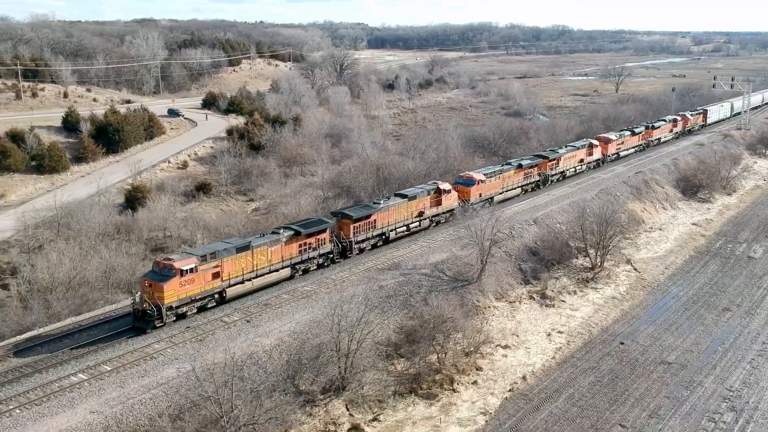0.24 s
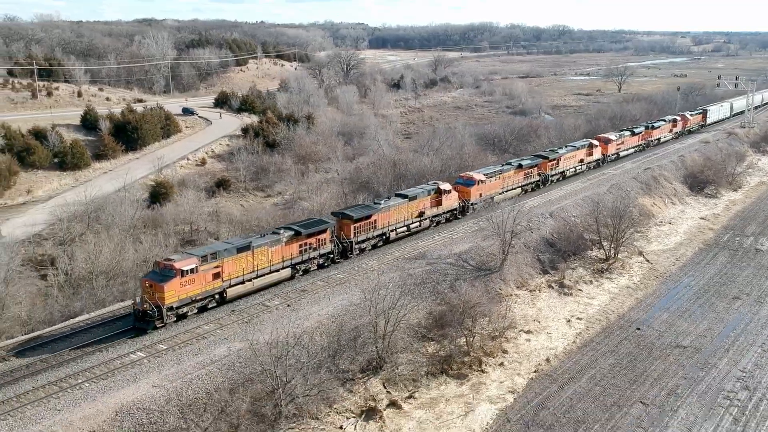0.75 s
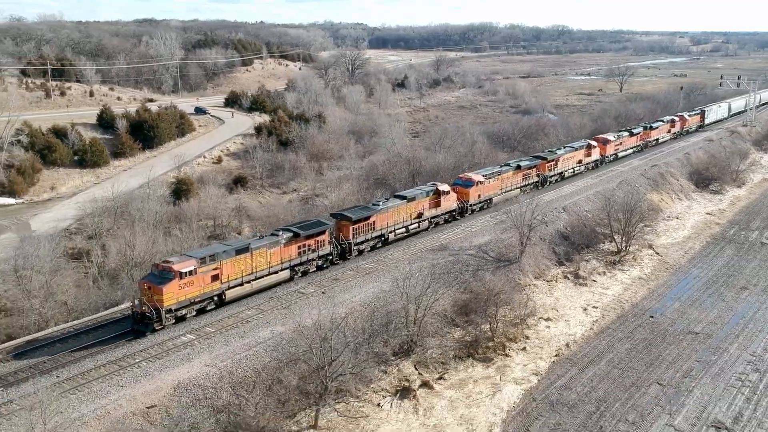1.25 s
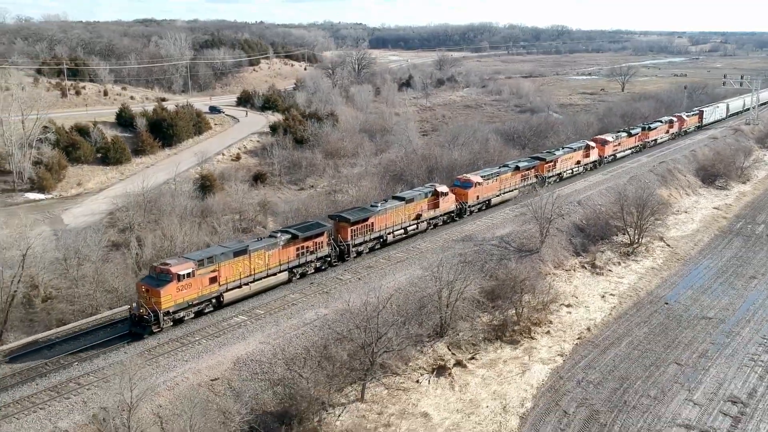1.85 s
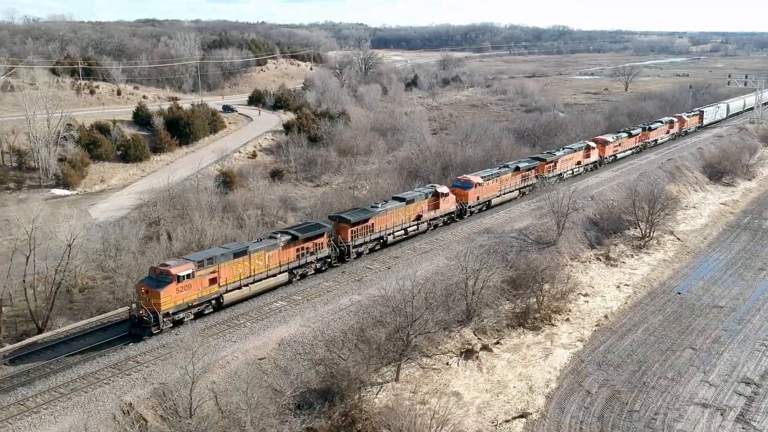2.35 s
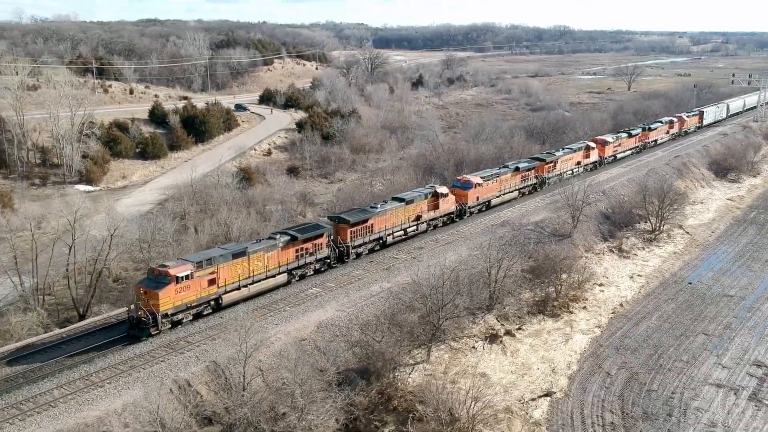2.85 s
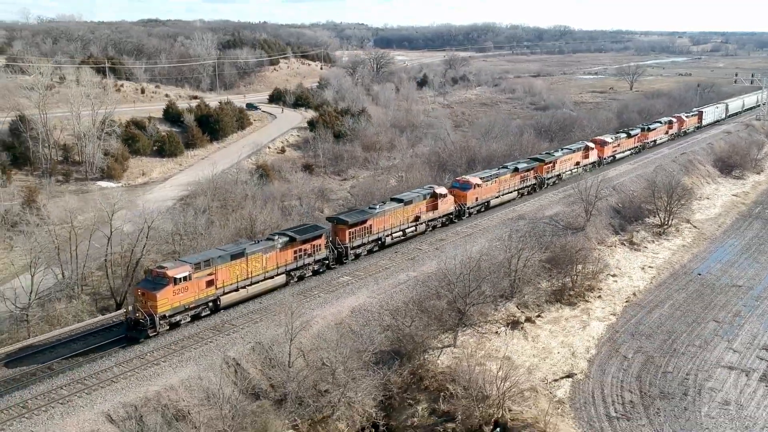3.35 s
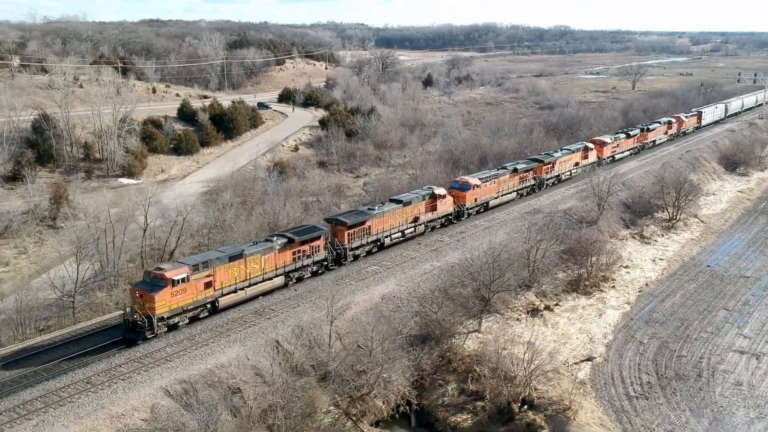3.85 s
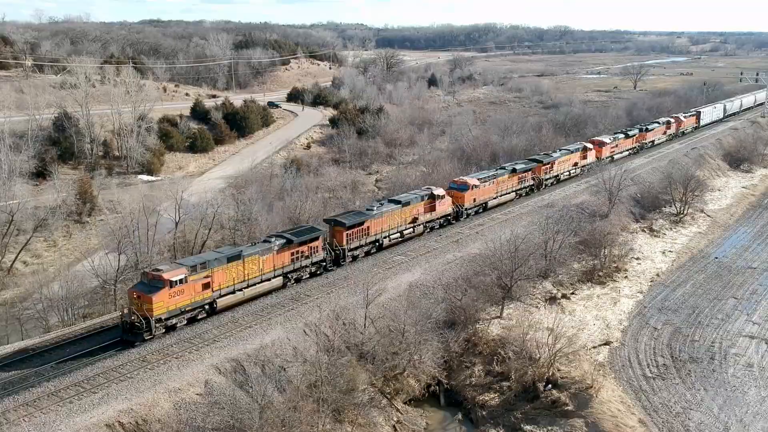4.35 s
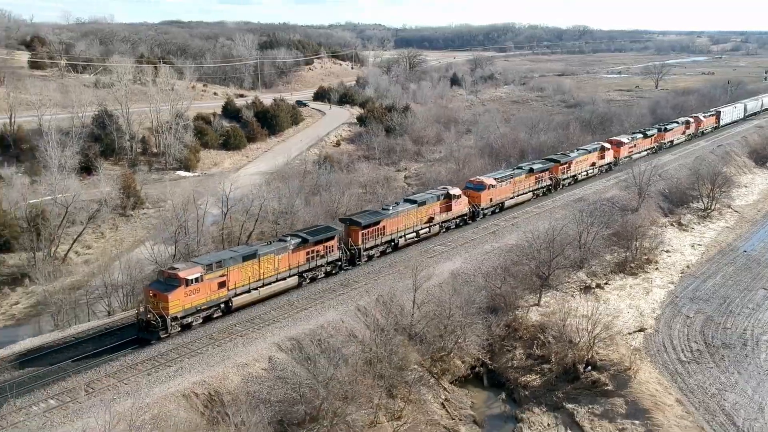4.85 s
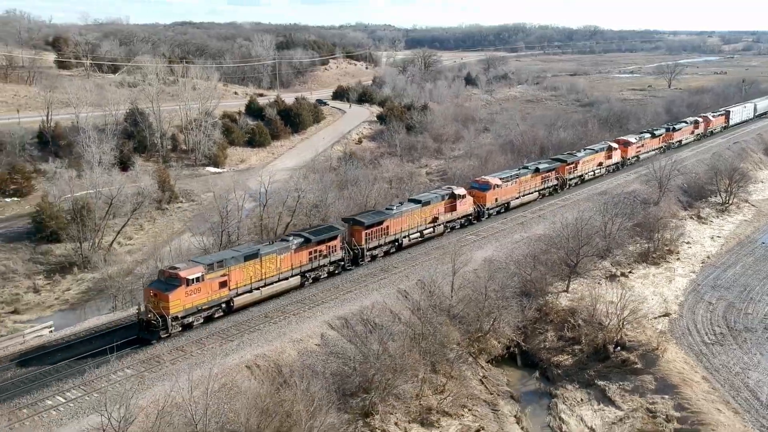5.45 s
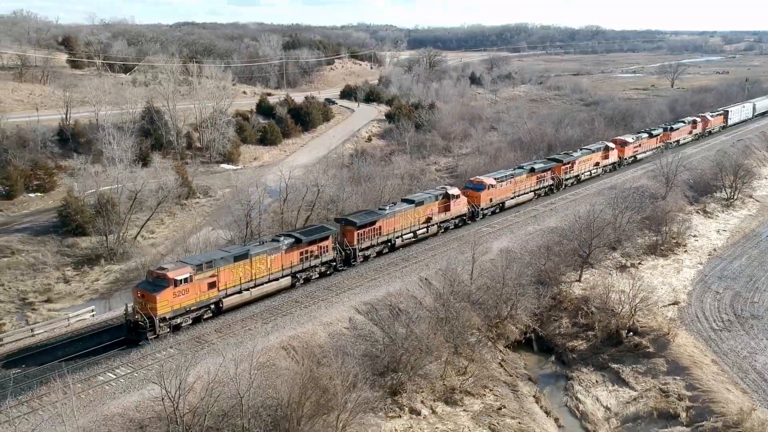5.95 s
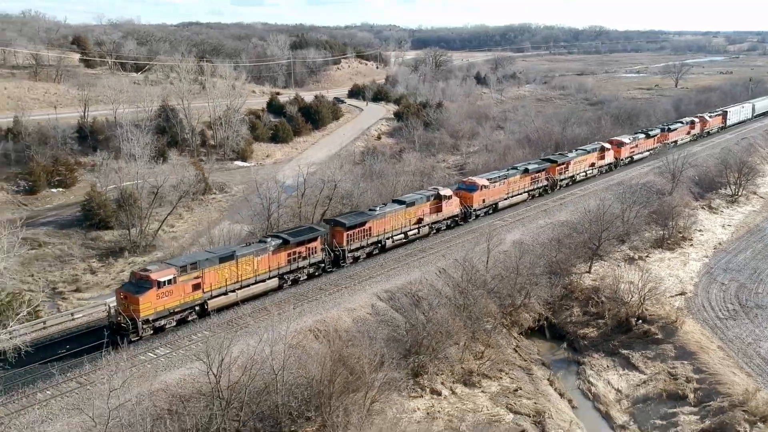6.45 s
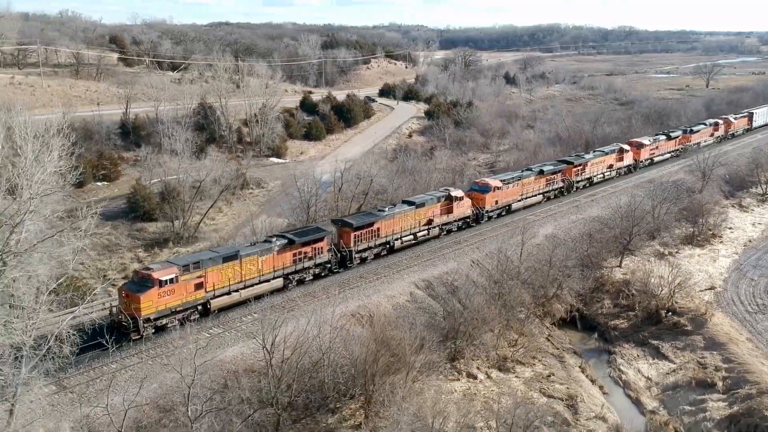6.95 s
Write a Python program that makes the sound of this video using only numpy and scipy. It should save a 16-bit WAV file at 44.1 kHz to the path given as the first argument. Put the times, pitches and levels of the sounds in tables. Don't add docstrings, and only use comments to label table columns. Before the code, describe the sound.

Outdoors, a small four-rotor drone hovers some way off, a steady airy rush of blades with thin whining tones that sag slightly in pitch and a very high faint hiss. A dull roll lies far below. Wind thumps a thin, bright microphone; near the middle a hard blast buffets and clicks it. The rush dims, then returns stronger with breathy whistles.

```python
import sys
import numpy as np
from scipy import signal
from scipy.fft import rfft, irfft, next_fast_len
from scipy.io import wavfile
from scipy.ndimage import uniform_filter1d

SR = 44100
rng = np.random.default_rng(int(sys.argv[2]) if len(sys.argv) > 2 else 0)


def voltage_ratio(decibels):
    exponent = np.asarray(decibels, float) / 20
    return 10 ** exponent


def transcribe(signal):
    frames = np.atleast_2d(signal).T
    limited = np.clip(frames, -1, 1)
    pcm = np.round(limited * 32767).astype(np.int16)
    wavfile.write(sys.argv[1], SR, pcm)


N = 317079
TIME_S = np.arange(N) / SR
SIZE = next_fast_len(N)
FREQ_HZ = np.maximum(np.arange(SIZE // 2 + 1) * SR / SIZE, 1)


def in_time(rows):
    time_s, *columns = np.transpose(rows)
    return [np.interp(TIME_S, time_s, c) for c in columns]


def swells(rows, blunt=1):
    centre_s, length_s, *columns = np.transpose(rows)
    coarse_s = np.arange(0, N + 64, 64) / SR
    phase = np.clip((coarse_s[:, None] - centre_s) / length_s, -.5, .5)
    arch = abs(np.cos(np.pi * phase)) ** blunt
    return [np.interp(TIME_S, coarse_s, arch @ c) for c in columns]


def rms_one(x):
    return x / np.sqrt(np.mean(x ** 2) + 1e-20)


def drift(rate_hz):
    r = np.exp(-80 * np.pi * rate_hz / SR)
    slow = signal.lfilter([1], [1, -2 * r, r * r], rng.standard_normal(N // 40 + 2002))[2000:]
    return np.interp(np.arange(N) / 40, np.arange(len(slow)), rms_one(slow))


def quick(rate_hz):
    slow = drift(rate_hz)
    return rms_one(slow - uniform_filter1d(slow, SR // 6))


def coloured(points):
    hz, db = np.transpose(points)
    tilt_db = np.interp(np.log(FREQ_HZ), np.log(hz), db, left=-120, right=-120)
    return rfft(rng.standard_normal(SIZE)) * voltage_ratio(tilt_db)


def steady(colour):
    return rms_one(irfft(coloured(colour), SIZE)[:N])


def smeared(width_hz, size):
    low = signal.butter(3, width_hz, fs=SR, output="sos")
    real, imaginary = signal.sosfilt(low, rng.standard_normal((2, size)))
    return rms_one(real) + 1j * rms_one(imaginary)


# time_s, loudness_db, clarity_db (top against the whole)
AIR_PATH = [(0.0, -28, -19.5), (0.32, -27.5, -23.5), (0.72, -26, -17.5), (0.84, -28.5, -22.5),
            (1.88, -29.5, -24.5), (3.6, -24, -18), (3.76, -31.5, -18.5), (4.14, -34, -22),
            (4.35, -31.5, -21), (4.58, -34, -19.5), (5.21, -31, -20.5), (5.31, -29.5, -19),
            (5.47, -25, -17.5), (5.67, -26.5, -21), (5.99, -23, -14), (6.59, -27.5, -19),
            (6.89, -25.5, -18), (7.19, -27.5, -16.5)]
# centre_s, length_s, gain_db, clarity_gain_db
EDDIES = [(.29, 0.18, 3, 4.5), (.7, 0.66, 2.5, 4.5), (.2, 0.14, 1, 3), (.1, .1, 0, 1.5), (2.8, 0.24, 1, 2),
          (3.68, 0.24, 0, -5), (5.1, 0.24, -2, -1), (5.75, 0.086, -1.5, 2.5), (1.3, 0.26, 1.5, 1),
          (1.56, 0.21, 1.5, -0.5), (2.35, 0.12, 1.5, 1), (3.0, 0.13, 2.5, 3), (3.2, .14, 0, 0.5),
          (3.52, 0.6, 0, 0), (4.36, 0.14, 2, 1.5), (4.88, 0.16, -1.5, 2), (5.3, 0.16, 3, -2),
          (5.47, 0.22, 1, -0.5), (5.92, 0.15, 0.5, 1), (6.1, 0.099, -1, -1), (6.27, 0.057, -0.5, -5.5),
          (6.4, 0.26, 0.5, -1), (6.86, 0.14, 0.5, 1)]


def path():
    loud_db, clear_db = np.add(in_time(AIR_PATH), swells(EDDIES))
    return loud_db, clear_db - clear_db.mean()


ZONE_CLARITY = [-0.55, -0.00046, 0.17, 0.55, 0.59]


def body():
    loud_db, clear_db = path()
    return loud_db - 6 + ZONE_CLARITY[0] * clear_db


# freq_hz, density_db_per_hz
SELF_NOISE_COLOUR = [(8000, -15), (10500, 0), (12500, -6), (13700, -6), (13950, -8)]


def self_noise():
    return voltage_ratio(-77) * steady(SELF_NOISE_COLOUR)


# time_s, level_db
FAR_LEVEL = [(0, -44.5), (.8, -43.5), (1.6, -52.5), (2.6, -47.5), (3.6, -49), (4, -58), (5.2, -59),
             (5.6, -55), (6.4, -47.5), (7.19, -52.5)]
# freq_hz, density_db_per_hz
FAR_COLOUR = [(520, -19), (600, -2.5), (720, -0.5), (950, -3.5), (1150, 0)]


def far_roll():
    return voltage_ratio(in_time(FAR_LEVEL)[0]) * steady(FAR_COLOUR)


# freq_hz, density_db_per_hz
WIND_COLOUR = [(35, -91), (60, -61), (170, -13), (285, -5), (839, 3), (1020, -1), (1200, 3.5), (1300, -19),
               (1690, -31), (2860, -120)]
# centre_s, length_s, gain_db (over the breeze), brightness_gain_db
GUSTS = [(.06, 0.38, 3, 12), (.31, .14, -2, -2), (.95, .1, 5, 3), (1.08, .18, 8, 0), (1.33, .4, -10, 2),
         (2.1, 0.89, 0.5, 22), (2.45, 0.42, 3.5, 7), (2.6, 0.11, 10.5, -26), (2.72, 0.18, 10, -9),
         (3.0, .5, 2, 6), (3.47, 0.19, 9, -10), (3.95, 0.12, 12, 1), (4.04, .06, 12, -8),
         (4.165, 0.095, 10.5, -2), (4.0, 0.026, 6, 17), (4.27, 0.17, 6, -26), (4.54, 0.073, 8, -2),
         (4.75, 0.54, -6, -1), (5.19, 0.17, 4.5, -12), (5.41, .07, 1, -1), (5.48, .08, -2, 11),
         (5.9, .8, 2, 0), (6.84, .08, 1.5, 4), (6.94, 0.089, 3, 0)]
# centre_s, length_s, gain_db, brightness_gain_db
BLAST = [
    (3.57, .08, 13, -6),
    (3.725, .23, 16.5, -1),
    (3.66, .09, .5, 6),
    (3.85, .04, 9, -6),
]


def wind(lumpy_db, split_hz):
    breeze_db, breeze_bright_db = -57, -2
    gust_db, bright_db = np.add(swells(GUSTS), swells(BLAST, blunt=.3))
    gust_db = gust_db + breeze_db
    bright_db = bright_db + breeze_bright_db
    gust_db = gust_db + 1.04 * (gust_db - gust_db.max())
    noise = coloured(WIND_COLOUR)
    upper = 1 / (1 + (split_hz / FREQ_HZ) ** 4)
    thump = rms_one(irfft(noise * (1 - upper), SIZE)[:N] * voltage_ratio(lumpy_db * drift(23)))
    rasp = rms_one(irfft(noise * upper, SIZE)[:N] * voltage_ratio(lumpy_db * drift(40)))
    return voltage_ratio(gust_db + 4.5) * (thump + voltage_ratio(bright_db) * rasp)


# time_s, peak_db
SNAPS = [(3.625, -15), (3.644, -15), (3.689, -20), (3.718, -21), (3.744, -15), (3.786, -21)]


def snaps():
    ring_hz, t60_s = 1000, .006
    clicks = np.zeros(N)
    for time_s, peak_db in SNAPS:
        clicks[round(time_s * SR)] = voltage_ratio(peak_db - 2)
    r, w = voltage_ratio(-60 / (t60_s * SR)), 2 * np.pi * ring_hz / SR
    return signal.lfilter([0, np.sin(w)], [1, -2 * r * np.cos(w), r * r], clicks + 1e-18)


def port():
    gusts = wind(lumpy_db=4.0, split_hz=520) + snaps()
    return signal.sosfilt(signal.butter(4, 178, "high", fs=SR, output="sos"), gusts)


# pitch_hz, level_db
SHAFT_HUM = [(102.4, -83)]


def shaft():
    hum = 0
    for pitch_hz, level_db in SHAFT_HUM:
        hum = hum + np.sqrt(2) * voltage_ratio(level_db + 1.9 * drift(2.1)) * np.sin(2 * np.pi * pitch_hz * TIME_S)
    return hum * voltage_ratio(0.46 * (body() + 24.5))


# centre_s, length_s, gain_db
DRIVE_TURNS = [
    (.7, 0.17, 0.5),
    (1.5, 0.67, 10),
    (2.0, .4, -1),
    (2.6, 0.47, -4),
    (3.35, 0.12, 0.5),
    (3.8, 0.95, -7),
    (4.6, .3, -3),
    (5.7, 0.99, 4.5),
    (6.6, 0.35, -1.5),
]
# freq_hz, density_db_per_hz
DRIVE_FLOOR = [(7000, -4.5), (8000, 6.5), (8300, 4), (10000, 0), (10700, -2.5), (11900, -1), (12400, -1),
               (13300, -14)]


def drive(floor_db):
    start_hz, sag_hz_per_s, width_hz = 11470, 17, 280
    loud_db, clear_db = path()
    level_db = -76 + 0.29 * (loud_db - loud_db.mean()) + 0.96 * clear_db
    level_db = level_db + 1.06 * TIME_S + swells(DRIVE_TURNS)[0]
    turn = 2 * np.pi * np.cumsum(start_hz - sag_hz_per_s * TIME_S) / SR
    narrow = np.real(smeared(width_hz, size=N) * np.exp(1j * turn))
    wide = voltage_ratio(floor_db - 0.15 * (level_db - level_db.mean())) * steady(DRIVE_FLOOR)
    return voltage_ratio(level_db + 1.3 * drift(6.7)) * (narrow + wide)


# start_s, length_s, pitch_hz, width_hz, level_db
WHISTLES = [(0.145, 0.69, 2300, 151, -32), (0.202, 0.15, 3700, 250, -38), (4.2, 0.33, 2150, 180, -37),
            (5.249, 0.47, 2380, 260, -31), (5.87, .1, 2250, 400, -27.5), (6.0, 0.2, 2300, 280, -29),
            (5.5, .12, 2900, 250, -34), (6.26, .2, 3050, 220, -34.5), (4.15, .99, 1400, 90, -46),
            (.22, 0.11, 3200, 700, -34), (.22, .1, 2280, 300, -31), (5.27, .1, 2080, 200, -34),
            (6.55, .42, 2060, 130, -35), (1.2, .5, 1750, 90, -39), (6.2, 0.2, 1740, 98, -36),
            (6.31, 0.25, 2300, 300, -30), (6.301, 0.81, 2160, 180, -33.5), (6.3, 0.59, 2950, 200, -37),
            (6.7, .3, 2830, 150, -32), (6.701, 0.43, 3640, 200, -36.5), (7.0, 0.1, 2280, 270, -29.5),
            (5.27, 0.24, 3700, 300, -35.5), (5.8, 0.4, 4040, 350, -35.5)]


def whistles():
    gain_db, wander, patchy_db = .3, .018, 1.5
    out, bend, patch = np.zeros(N), quick(10.0), quick(14.0)
    for k, (start_s, length_s, pitch_hz, width_hz, level_db) in enumerate(WHISTLES):
        n = np.arange(int(start_s * SR), min(int((start_s + length_s) * SR), N))
        own = (n + k * SR // 3) % N
        arch = np.sin(np.pi * (n / SR - start_s) / length_s)
        swell = arch * voltage_ratio(level_db + gain_db + patchy_db * patch[own])
        turn = 2 * np.pi * pitch_hz * np.cumsum(1 + wander * bend[own]) / SR
        band = smeared(.65 * width_hz, size=SR)[:len(n)]
        out[n] += swell * np.real(band * np.exp(1j * turn))
    return out


# start_hz, sag_hz_per_s, rest_db (against the rush body)
ROTOR_A = (1415, 3.9, -14)
ROTOR_B = (1478, 2.9, -22.5)
ROTOR_C = (1728, .9, -27)
ROTOR_D = (1703, .7, -27)
ROTOR_LATE = (1434, 1.2, -22)
# centre_s, length_s, gain_db
FORWARD_A = [(.3, 1.2, 3), (1.4, .6, 4), (2.32, .5, 8), (2.6, .5, 3), (3.2, 1.2, 4), (3.6, .5, 5),
             (4.4, .7, 3), (4.79, .24, 11), (5.09, .34, 13), (6.23, .2, -4), (7, .9, 6)]
FORWARD_B = [(.3, 1.5, 11), (1.8, .7, 10), (2.8, 1.4, 12), (6.75, 1.4, 9)]
FORWARD_C = [(1.7, 5.8, 14), (1.4, .7, 5), (2.45, .7, 4), (3.8, 1, 4)]
FORWARD_D = [(1.7, 4, 8), (1.45, .6, 6), (2.4, 1, 9), (3.2, .5, 9)]
FORWARD_LATE = [(4, .8, 11), (5.1, .9, 9), (5.95, 1.1, 12), (6.85, 1.4, 10)]
# ratio (to the loudest overtone), level_db (relative)
ORDERS_A = [(.5, -22), (1.245, -7), (1.48, -7)]
ORDERS_C = [(.2, -24)]
ORDERS_D = [(.201, -16)]


def rotor(tone, forward, orders, wobble, fade_db):
    start_hz, sag_hz_per_s, rest_db = tone
    pitch_hz = (start_hz - sag_hz_per_s * TIME_S) * (1 + wobble * drift(8.17))
    turn = 2 * np.pi * np.cumsum(pitch_hz) / SR
    tones = 0
    for ratio, level_db in [(1, 0.013)] + list(orders):
        level = voltage_ratio(level_db + fade_db * drift(8.9))
        tones = tones + level * np.sin(ratio * turn + 6 * rng.random())
    return np.sqrt(2) * voltage_ratio(rest_db + swells(forward)[0] + body()) * tones


def rotors():
    front = rotor(ROTOR_A, FORWARD_A, ORDERS_A, wobble=0.00162, fade_db=2.5)
    front = front + rotor(ROTOR_B, FORWARD_B, [], wobble=0.00124, fade_db=2.5)
    rear = rotor(ROTOR_C, FORWARD_C, ORDERS_C, wobble=0.00092, fade_db=1.0)
    rear = rear + rotor(ROTOR_D, FORWARD_D, ORDERS_D, wobble=0.0007, fade_db=2.5)
    late = rotor(ROTOR_LATE, FORWARD_LATE, [], wobble=0.00168, fade_db=2.5)
    return front + voltage_ratio(1.5) * rear + late


RUSH_ZONES_HZ = [1500, 2300, 3700, 5500, 7500]
# freq_hz, density_db_per_hz
RUSH_COLOUR = [(60, -70), (100, -40), (290, -16), (530, -27), (700, -15.5), (1200, -6.5), (1400, -2.5),
               (2300, 0.5), (3300, -4.5), (3900, -4), (4400, -9.5), (4800, -14), (7800, -31.5), (8200, -45)]


def rush(flutter_db, patchy_db):
    loud_db, clear_db = path()
    zones_db = loud_db + np.outer(ZONE_CLARITY, clear_db)
    zones_db[-1] += 0.81 * swells(DRIVE_TURNS)[0]
    zones_db = zones_db - zones_db.mean(axis=1, keepdims=True)
    noise, flutter, out = coloured(RUSH_COLOUR), quick(21), 0
    third = 3 * np.log2(FREQ_HZ / 55)
    for k in range(25):
        band = irfft(noise * np.clip(1 - abs(third - k), 0, 1), SIZE)[:N]
        place = np.interp(np.log(55 * 2 ** (k / 3)), np.log(RUSH_ZONES_HZ), range(5))
        share = np.clip(1 - abs(place - np.arange(5)), 0, 1)
        short_wave = min(k / 21, 1) ** 2
        level_db = share @ zones_db + short_wave * flutter_db * flutter + patchy_db * drift(5.7)
        out = out + band * voltage_ratio(level_db)
    return voltage_ratio(-28) * rms_one(out)


def scene():
    drone = drive(floor_db=3.5) + shaft() + whistles() + rotors() + rush(flutter_db=1.3, patchy_db=.7)
    return (far_roll() + port() + drone)[None]


# freq_hz, step_db
TOP_STEP = [(5500, -85), (6900, -62), (7700, -56), (8150, -51), (8500, -56), (8800, -53), (9500, -56),
            (10700, -54), (11400, -55), (12200, -53), (12600, -59), (13600, -58), (13950, -53)]


def coarse_top(x, uneven_db, follow, hop=1024, start=420):
    bins, n = np.arange(256, 656), np.arange(2 * hop)
    window = signal.windows.kaiser_bessel_derived(2 * hop, 4 * np.pi)
    cosines = np.cos(np.pi / hop * np.outer(n + .5 + hop / 2, bins + .5))
    basis = window[:, None] * cosines * np.sqrt(2 / hop)
    padded = np.pad(x, (2 * hop - start, 3 * hop))
    frames = np.lib.stride_tricks.sliding_window_view(padded, 2 * hop)[::hop].copy()
    fine = frames @ basis
    loud_db = 10 * np.log10(np.mean(fine[:, 130:] ** 2, axis=1, keepdims=True) + 1e-9)
    hz, db = np.transpose(TOP_STEP)
    uneven = np.repeat(rng.standard_normal((len(fine), 25)), 16, axis=1)
    step_db = np.interp(bins * SR / 2 / hop, hz, db) + uneven_db * uneven
    step = voltage_ratio(step_db + follow * (loud_db - loud_db.mean()))
    rounded = np.sign(fine) * np.floor(abs(fine) / step + .4) * step
    error = (rounded - fine) @ basis.T
    overlap = error[1:, :hop] + error[:-1, hop:]
    return x + overlap.ravel()[hop - start:][:N]


def low_pass(x):
    return signal.sosfilt(signal.butter(12, 13860, fs=SR, output="sos"), x)


def record(dry):
    heard = dry[0] + self_noise()
    mix = coarse_top(heard, uneven_db=3.5, follow=0.96)[None]
    return low_pass(mix)


dry = scene()
out = record(dry)
transcribe(out)
```